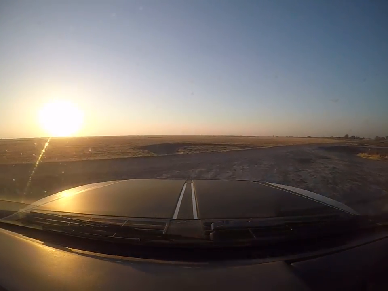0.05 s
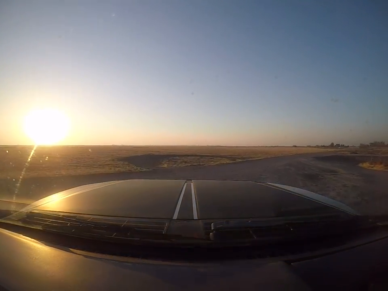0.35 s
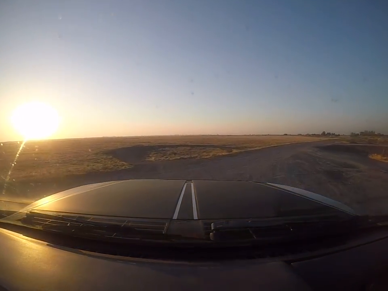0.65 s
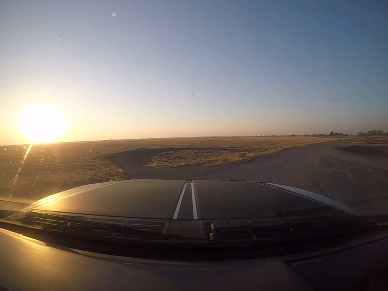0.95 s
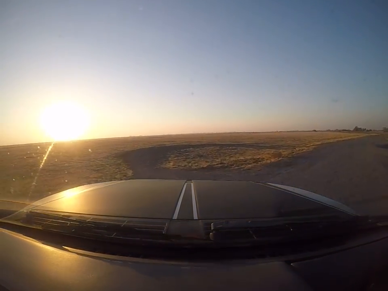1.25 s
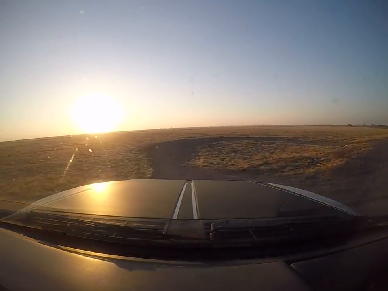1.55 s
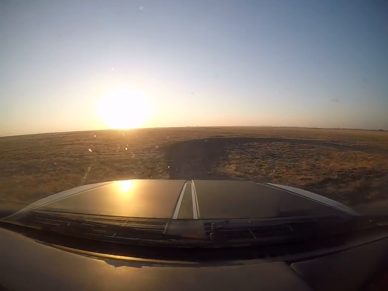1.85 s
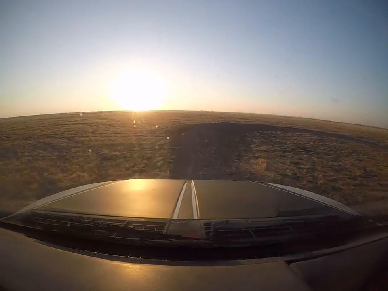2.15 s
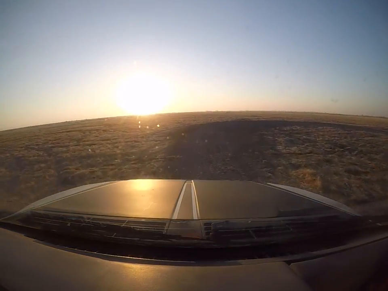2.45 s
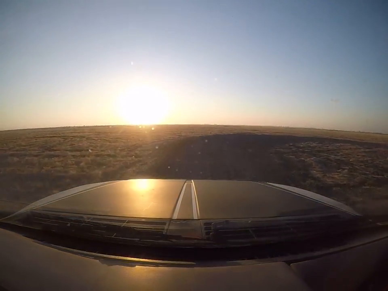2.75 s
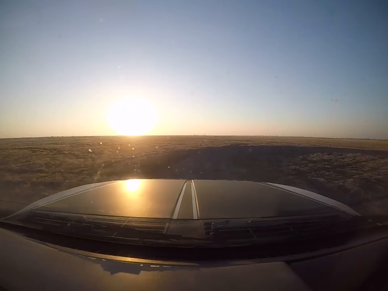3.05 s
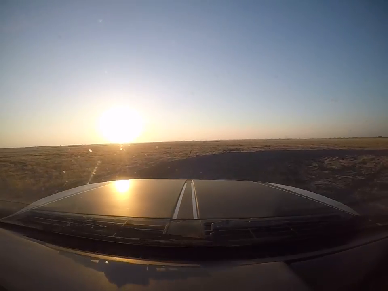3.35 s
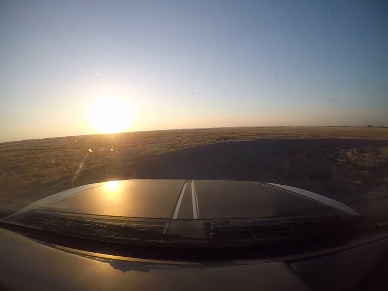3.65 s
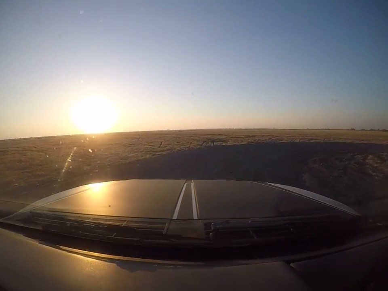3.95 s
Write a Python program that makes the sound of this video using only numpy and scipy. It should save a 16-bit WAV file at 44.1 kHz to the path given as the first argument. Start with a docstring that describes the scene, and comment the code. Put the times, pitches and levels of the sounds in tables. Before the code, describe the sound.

Low engine rumble inside a vehicle on bumpy dirt, with chattering trim and a sharp knock.

```python
"""An engine booms in the cab of an off-road vehicle rolling along a dirt track. Its firing note and the
drone of the drive train are wavering tones; the ground forces the body into a broadband rumble, ruts
thump the suspension and the tyres crunch on grit. Loose trim chatters in quick runs through a bend and
a hard part knocks, both ringing in their normal modes. Small metal parts clink, jingle and squeal,
and a limiter holds the bass down."""
import sys
import numpy as np
from scipy import signal
from scipy.fft import rfft, irfft, next_fast_len
from scipy.io import wavfile
from scipy.ndimage import uniform_filter1d, minimum_filter1d, map_coordinates

SR = 44100
rng = np.random.default_rng(int(sys.argv[2]) if len(sys.argv) > 2 else 0)


def dump(signal):
    """Clip the signal to [-1, 1] and save it as 16-bit WAV at the path in sys.argv[1]."""
    limited = np.clip(np.atleast_2d(signal).T, -1, 1)
    pcm = np.round(limited * 32767).astype(np.int16)
    wavfile.write(sys.argv[1], SR, pcm)


N = 176400

# Spectrum of tread on dirt. Each row: frequency in Hz, relative spectral density in dB.
TREAD_SPECTRUM = [(180,-19),(400,3),(900,-7.5),(1060,-5),(1450,-10),(1850,-14),(3000,-18.5),(5000,-37),(15000,-81.5)]


def engine(boom_db=-1.5, waver_db=2, drone_waver=0.0078):
    """Periodic forcing: the firing note booms unevenly in the cab; the drive train drones above it."""
    # Each row: time in seconds, firing rate in Hz, relative level in dB.
    firing = [(0,56.84,-29),(.35,58.7,-12),(.7,63.92,-12.5),(.95,56.77,-9.5),(1.25,68.1,-9),(1.52,60.17,-14),(1.8,67,-11),(2.08,55.94,-9),(2.45,60.86,-13),(2.9,62.13,-13),(3.2,58.67,-13.5),(3.5,65.53,-12),(3.92,58.3,-9)]
    # The drone fades as the load eases. Each row: time in seconds, pitch in Hz, level in dB.
    drive_train = [(0,246,-22.5),(.35,242,-27),(.48,237.6,-58.5),(.73,214,-20.5),(.9,231.1,-30),(1.14,232,-31),(1.36,219,-30.5),(1.8,213,-53)]
    firing_hz, firing_db = curves(firing)
    boom = amp(firing_db + boom_db + waver_db * wobble(12)) * sine(firing_hz * (1 + 0.022 * wobble(22)))
    drone_hz, drone_db = curves(drive_train)
    drone = amp(drone_db + 3.5 * wobble(35)) * sine(drone_hz * (1 + drone_waver * wobble(36)))
    return boom + drone


def rumble(body_db=3, panel_db=-28.5):
    """Random forced vibration: rough ground shakes chassis, body and panels, each in its own band."""
    # Strength of the shaking. Each row: time in seconds, relative level in dB.
    chassis_levels = [(0,-20),(.3,-15),(.76,-8.5),(1.2,-16.5),(1.7,-13.5),(2.25,-18.5),(2.75,-11.5),(3.8,-13)]
    body_levels = [(0,-16.5),(.55,-20),(.78,-15),(1.2,-20.5),(1.62,-13),(1.85,-22.5),(2.3,-22.5),(2.55,-19.5),(3.38,-21.5),(3.8,-18.5)]
    # Response of each part. Each row: frequency in Hz, relative spectral density in dB.
    chassis_spectrum = [(8,-22),(25,-14),(38,-4),(72,-9),(200,-90)]
    body_spectrum = [(45,-40.5),(72,6),(100,-0.5),(120,-3),(138,-2),(170,-11),(250,-21),(800,-79.5)]
    panel_spectrum = [(150,-47.5),(245,-9),(292,-1.5),(330,-7.5),(365,-18),(900,-81.5)]
    layers = [(curves(chassis_levels)[0], chassis_spectrum),
              (curves(body_levels)[0] + body_db, body_spectrum),
              (panel_db, panel_spectrum)]
    return sum(amp(db) * steadied(noise(spectrum), span_s=0.18) for db, spectrum in layers)


def tyres(roar_db=2, grains_per_s=260, grain_decay_s=0.003, crackle_gain=0.98, flutter_db=1.88):
    """Rolling noise: tread roars on dirt, and random impacts of grit add a crackle of shot noise."""
    # Each row: time in seconds, relative levels of tread roar and of grit hiss in dB.
    rolling_levels = [(0,-33,-53.5),(.33,-34,-52),(.47,-37,-57.5),(.68,-32.5,-51.5),(.94,-35,-58),(1.1,-32.5,-49),(1.8,-35,-51),(2.2,-41,-59.5),(2.62,-38.5,-62),(2.97,-42,-58.5),(3.25,-37,-58.5),(3.6,-35.5,-53.5)]
    # Each row: frequency in Hz, relative spectral density in dB.
    grit_spectrum = [(900,-26),(2500,-11.5),(3600,0),(6600,-8.5),(7800,-16),(15000,-35)]
    tread_db, grit_db = curves(rolling_levels)
    flutter = flutter_db * wobble(45)
    tread = amp(tread_db + roar_db + flutter) * noise(TREAD_SPECTRUM)
    impacts = rng.random(N) < grains_per_s / SR
    strengths = amp(4.9 * np.minimum(rng.exponential(size=N), 3))
    grains = signal.lfilter([1], [1, -np.exp(-1 / (grain_decay_s * SR))], impacts * strengths)
    crackle = grains * rng.standard_normal(N)
    grit = cab(noise(grit_spectrum) + crackle_gain * coloured(crackle, grit_spectrum))
    return tread + amp(grit_db + flutter + wobble(34)) * grit


def ruts(scuff_corner_hz=587):
    """Impact and friction: wheels drop into ruts, thumping the suspension, and scuff loose dirt."""
    # Each row: start in seconds, hold in seconds, level in dB.
    drops = [(2.645,0.016,-13),(2.762,0.038,-11.5),(3.043,0.015,-19),(3.809,0.026,-20)]
    scuffs = [(0.35,0.0099,-26),(1.029,0.089,-30),(2.708,.01,-33.5)]
    # Each row: frequency in Hz, relative spectral density in dB.
    thump_spectrum = [(50,-22),(130,10),(320,2),(400,-8.5),(12000,-68)]
    thumping = sum(amp(db) * burst(start, 0.0045, hold, t60=0.16) for start, hold, db in drops)
    scuffing = sum(amp(db) * burst(start, 0.012, hold, t60=0.095) for start, hold, db in scuffs)
    dirt = unit(filtered(noise(TREAD_SPECTRUM), lambda hz: hz ** 2 / (1 + (hz / scuff_corner_hz) ** 3)))
    return thumping * steadied(noise(thump_spectrum), span_s=0.024) + scuffing * dirt


def chatter(rasp_db=-1.5, grain_db=3, rasp_t60=0.066, ring_t60=0.085, lead_s=0.0021):
    """Frictional excitation: each slip of loose trim is a grainy rasp that leaves its modes ringing."""
    # Each row: time in seconds, relative level in dB.
    slips = [(0.0698, -37.5), (0.295, -31.5), (0.971, -36.5), (1.1437, -32), (1.1936, -29), (1.2498, -32),
             (1.3764, -34.5), (1.4268, -33), (1.481, -34.5), (1.557, -36), (1.6013, -36.5), (1.6474, -37),
             (1.7027, -33), (1.757, -36), (1.8203, -32.5), (1.876, -34.5), (1.931, -38), (1.985, -38.5),
             (2.2556, -41), (2.315, -39), (2.376, -45), (2.4384, -36.5), (2.4995, -41), (2.5664, -39),
             (2.7008, -43), (2.901, -42), (3.05, -41.5), (3.5904, -34), (3.8598, -33.5), (3.92, -34.5),
             (3.983, -30)]
    # Each row: frequency in Hz, relative spectral density in dB.
    rasp_spectrum = [(600,-19.5),(1800,3.5),(3600,5.5),(6300,-2.5),(10000,-16.5),(15000,-35.5)]
    # Each row: natural frequency in Hz, relative level in dB.
    trim_modes = [(3780,-14),(4530,-17.5),(5480,-19.5),(8430,-28.5)]

    def envelope(t60):
        return sum(amp(db) * burst(time - lead_s, 0.0044, 0.0033, t60) for time, db in slips)

    rasp = amp(rasp_db) * unit(amp(grain_db * wobble(700)) * cab(noise(rasp_spectrum)))
    ring = ringing(trim_modes, rough=0.009, vary_db=4.5)
    return envelope(rasp_t60) * rasp + envelope(ring_t60) * ring


def knock(crack_db=-1, crack_t60=0.05, thud_hz=54.6, thud_db=16, ring_t60=0.069):
    """Impact excitation: a hard loose part strikes with a thud and a crack; its modes decay quickly."""
    # Each row: start in seconds, relative level in dB.
    blows = [(0.87,-31.5),(1.554,-15),(2.141,-35),(2.161,-39)]
    # Each row: frequency in Hz, relative spectral density in dB.
    crack_spectrum = [(300,-2.5),(900,-0.5),(3200,-10.5),(7000,-23.5),(15000,-51)]
    # Each row: natural frequency in Hz, relative level in dB.
    part_modes = [(1020,-14),(1380,-6.5),(1700,-6.5),(2040,-8.5),(2290,-11.5),(3270,-13.5)]

    def envelope(t60):
        return sum(amp(db) * burst(start, 0.0055, 0.0049, t60) for start, db in blows)

    crack = amp(crack_db) * envelope(crack_t60) * noise(crack_spectrum)
    thuds = np.zeros(N)
    for start, db in blows:
        push = np.cos(2 * np.pi * thud_hz * (clock() - start))
        thuds += amp(db + thud_db) * burst(start, 0.0057, 0, ring_t60) * push
    return crack + thuds + envelope(ring_t60) * ringing(part_modes, rough=0.0304, vary_db=1)


def metal(tremble_db=-83, ring_db=-6, clink_t60=0.066):
    """Resonance of small fittings: they clink, jingle when jolted, tremble between and squeal on rubbing."""
    # Each row: start in seconds, pitch in Hz, level in dB.
    strikes = [(2.98,5470,-52),(3.315,4300,-49.5),(3.763,4370,-43)]
    # Each row: start in seconds, hold in seconds, level in dB.
    jolts = [(0.077,.07,-58.5),(0.292,0.083,-60),(1.013,.04,-65.5)]
    # Each row: start in seconds, hold in seconds, pitch in Hz, level in dB.
    rubs = [(0.212,.065,10380,-64),(1.15,0.19,10245,-64)]
    # Natural frequencies of the fittings in Hz.
    modes_hz = [12700, 13150, 14420, 14900]
    # Each row: frequency in Hz, relative spectral density in dB.
    jingle_spectrum = [(2500,-20.5),(6800,3.5),(9000,-2.5),(15000,-8)]
    clinks = sum(amp(db) * burst(start, 0.002, 0, clink_t60) * sine(hz * (1 + 0.0052 * wobble(650)))
                 for start, hz, db in strikes)
    trembling = amp(tremble_db + 4.6 * wobble(11))
    jolting = sum(amp(db) * burst(start, 0.003, hold, t60=0.08) for start, hold, db in jolts)
    squeals = sum(amp(db) * burst(start, 0.0091, hold, t60=0.15) * sine(hz)
                  for start, hold, hz, db in rubs)
    ring = unit(ringing([(hz, 0) for hz in modes_hz], rough=0.012, vary_db=5.5))
    jingle = unit(amp(5 * wobble(200)) * (noise(jingle_spectrum) + amp(ring_db) * ring))
    return clinks + squeals + (trembling + jolting) * jingle


def cab(x, t60=0.063, wet=0.49):
    """Reverberation: dense, short reflections off glass and trim add a boxy ring; the result has rms 1."""
    t = clock()[:SR // 10]
    tail = rng.standard_normal(len(t)) * amp(-60 * t / t60)
    reflections = signal.fftconvolve(x, tail / np.linalg.norm(tail))[:N]
    return unit(x + wet * reflections)


def ringing(modes, rough, vary_db):
    """Modal superposition: one tone for each (Hz, dB) mode, wavering in pitch and strength."""
    return sum(amp(db + vary_db * wobble(22)) * sine(hz * (1 + rough * wobble(500))) for hz, db in modes)


def amp(db):
    """Amplitude ratio of a level in decibels."""
    return 10 ** (np.asarray(db) / 20)


def unit(x):
    """Normalisation to rms 1."""
    return x / np.sqrt(np.mean(x ** 2) + 1e-20)


def clock():
    """Time of each sample in seconds."""
    return np.arange(N) / SR


def curves(rows):
    """Linear interpolation: one value per sample for each column after the time."""
    times, *columns = np.transpose(rows)
    return [np.interp(clock(), times, column) for column in columns]


def wobble(rate):
    """Random modulation: a smooth curve through `rate` Gaussian values a second."""
    return map_coordinates(rng.standard_normal(4096), [clock() * rate], mode="wrap")


def filtered(x, response):
    """Linear filtering: the spectrum of x times a response of frequency in Hz."""
    size = next_fast_len(N + SR // 2)
    return irfft(rfft(x, size) * response(np.fft.rfftfreq(size, 1 / SR)), size)[:N]


def coloured(x, spectrum):
    """Spectral shaping of x by (Hz, dB) points joined on a logarithmic frequency axis, at rms 1."""
    points_hz, db = np.transpose(spectrum)
    return unit(filtered(x, lambda hz: amp(np.interp(np.log(hz + 1), np.log(points_hz + 1), db))))


def noise(spectrum):
    """Gaussian noise of the given spectrum, at rms 1."""
    return coloured(rng.standard_normal(N), spectrum)


def steadied(x, span_s):
    """Division by the running rms evens out slow chance swells."""
    power = abs(uniform_filter1d(x * x, max(int(span_s * SR), 1)))
    return unit(x / np.sqrt(power + 1e-3))


def burst(start, rise, hold, t60):
    """Damped envelope: linear rise, hold, then exponential decay of 60 dB in t60; times in seconds."""
    t = clock() - start
    decay = np.exp(-np.log(1000) * np.clip((t - rise - hold) / t60, 0, 3))
    return np.clip(t / rise, 0, 1) * decay


def sine(hz):
    """A tone of rms 1 whose phase is the integral of its frequency."""
    cycles = np.cumsum(hz * np.ones(N)) / SR + rng.random()
    return np.sqrt(2) * np.sin(2 * np.pi * cycles)


def scene():
    """Superposition of all sources behind the windscreen, in one channel."""
    return (engine() + rumble() + tyres() + ruts() + chatter() + knock() + metal())[None]


def record(dry, ceiling_db=-3.5, hold_s=0.02, knee=6, top_hz=15300):
    """Soft limiting: the gain dips on the bass peaks; a low-pass filter then limits the bandwidth."""
    x = dry[0]
    span = max(int(hold_s * SR), 1)
    needed_gain = (1 + (abs(x) / amp(ceiling_db)) ** knee) ** (-1 / knee)
    gain = uniform_filter1d(minimum_filter1d(needed_gain, span), span)
    return filtered(x * gain, lambda hz: hz < top_hz)[None]


dry = scene()
out = record(dry)
dump(out)
```